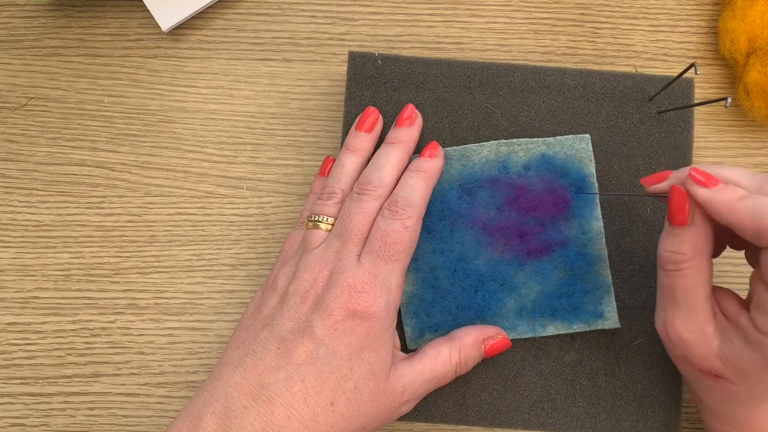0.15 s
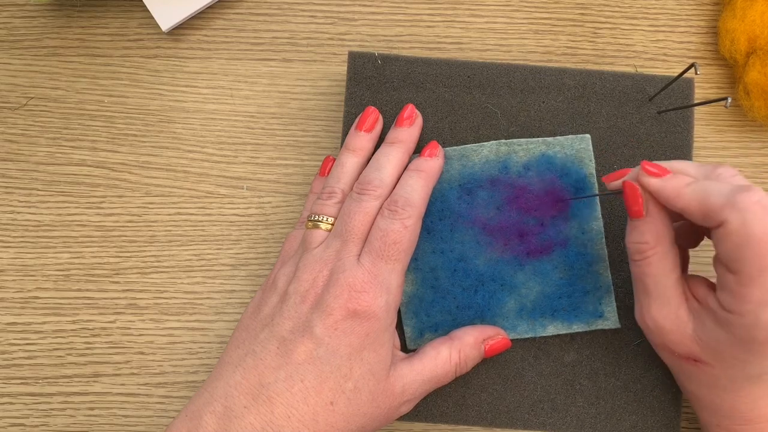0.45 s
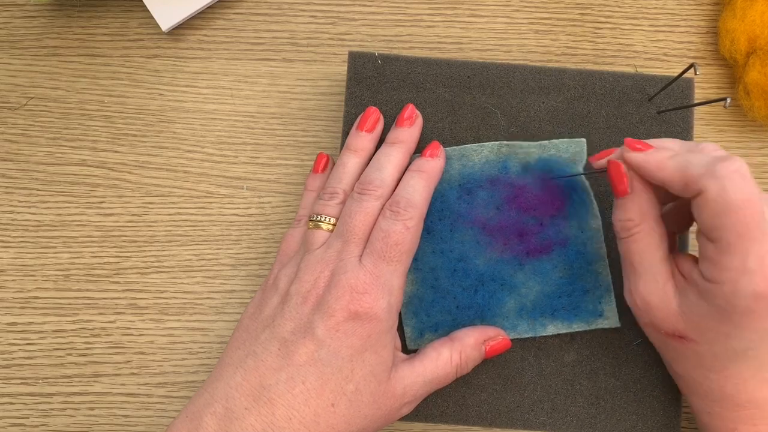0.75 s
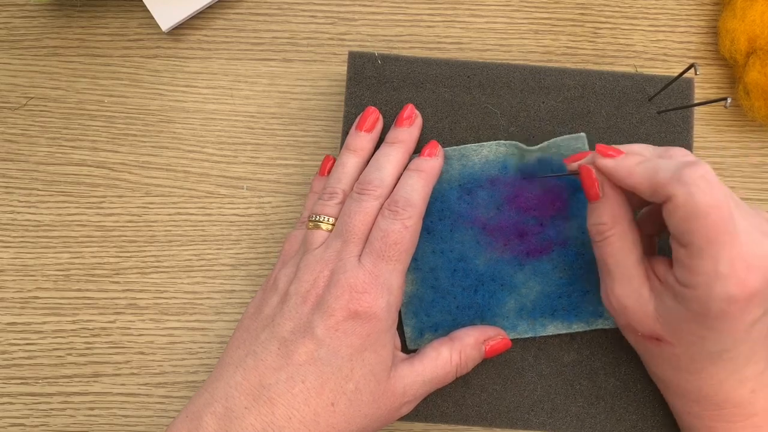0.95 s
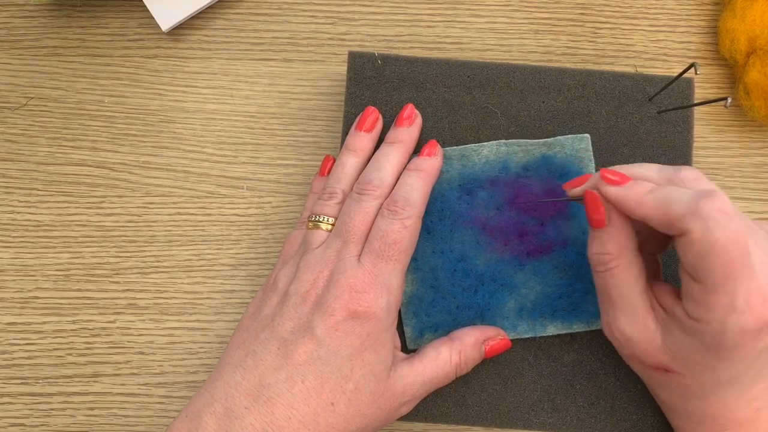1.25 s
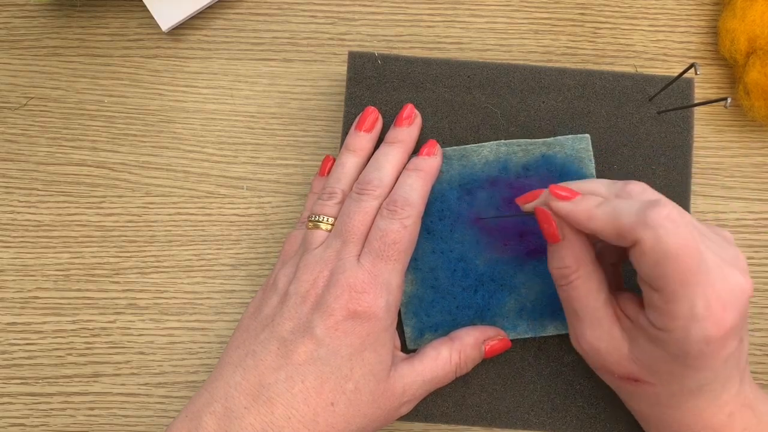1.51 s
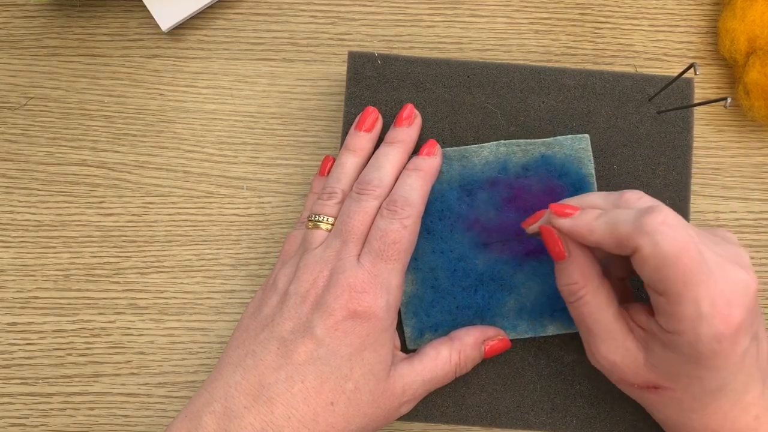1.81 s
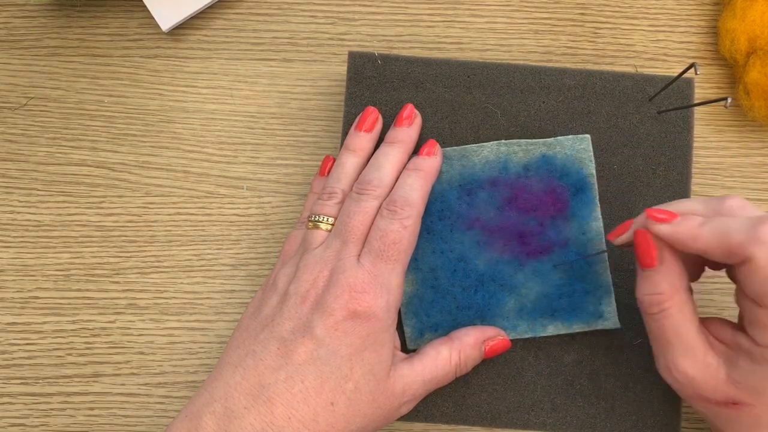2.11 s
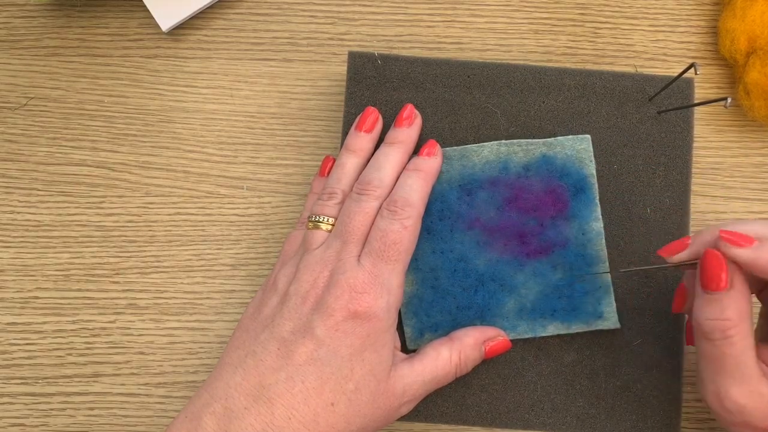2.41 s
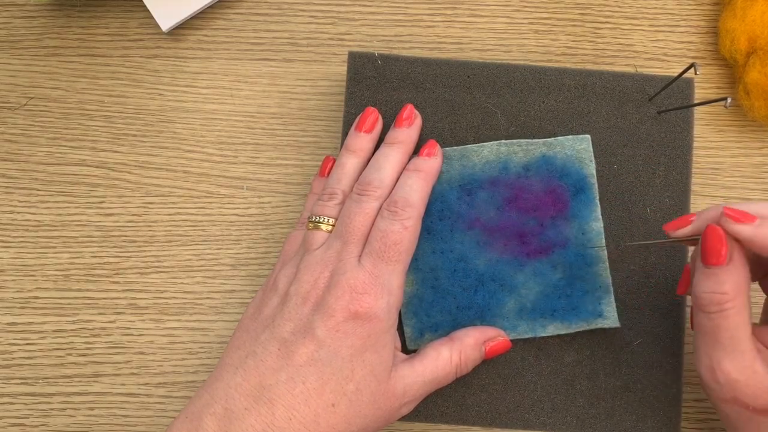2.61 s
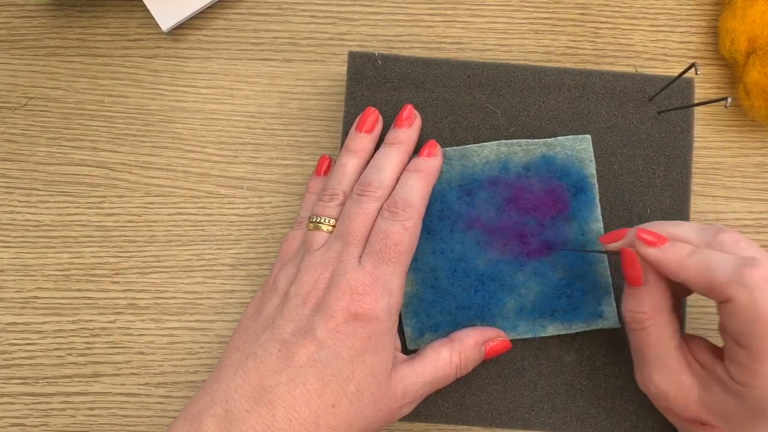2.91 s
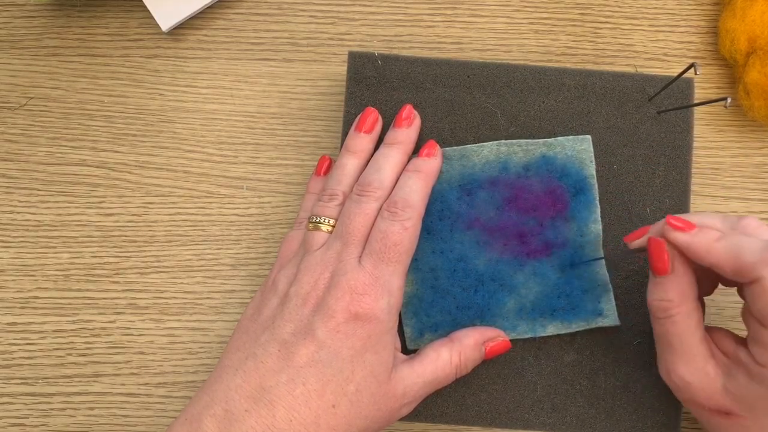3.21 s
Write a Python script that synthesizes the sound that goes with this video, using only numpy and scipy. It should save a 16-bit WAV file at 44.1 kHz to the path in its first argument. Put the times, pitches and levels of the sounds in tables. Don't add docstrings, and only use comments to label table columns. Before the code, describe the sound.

Rapid needle stabs crunch into felted wool on foam, each with a small table thud.

```python
import sys
import numpy as np
from scipy import signal
from scipy.fft import rfft, irfft, next_fast_len
from scipy.io import wavfile
from scipy.ndimage import map_coordinates

SR = 44100
rng = np.random.default_rng(int(sys.argv[2]) if len(sys.argv) > 2 else 0)


def log_audio(samples):
    frames = np.atleast_2d(samples).T
    limited = np.clip(frames, -1, 1)
    pcm = np.round(limited * 32767).astype(np.int16)
    wavfile.write(sys.argv[1], SR, pcm)


def to_linear_factor(level_db):
    exponent = np.asarray(level_db, float) / 20
    return 10 ** exponent


N = 147735

# frequency in Hz, level in dB per Hz.
AIR_COLOUR = [(15, -42), (25, -2), (185, 5), (591, -10), (1940, -14.5), (3080, -21.5), (3920, -21),
              (10700, -25), (16000, -29)]
# time in seconds, level in dB.
AIR_DRIFT = [(0, 2), (.6, 1), (1.7, 0), (2.5, -1.5), (3.35, -3)]
AIR_DB, HISS_TOP_HZ = -70.5, 16000
RUMBLE_HZ, RUMBLE_WIDTH_HZ, RUMBLE_DB = 66, 35, -67.5

# frequency in Hz, time to fall 60 dB in seconds.
ROOM_DECAY = [(150, 0.26), (700, 0.17), (3000, 0.14), (12000, 0.11)]
ROOM_DB = -14.5

# start in seconds, length in seconds, pitch in Hz, level in dB.
BIRDS = [
    (1.499, 0.11, 3450, -67.5),
    (1.724, 0.098, 3500, -68.5),
    (2.206, 0.07, 2720, -74),
    (3.06, 0.11, 2750, -66),
    (3.201, 0.096, 3350, -79),
    (3.275, 0.14, 3000, -72.5),
]
BIRD_SAG_HZ_PER_S, BIRD_BLUR_HZ, BIRD_HALO_HZ, BIRD_HALO_DB = 1800, 150, 420, -13

# frequency in Hz, level in dB, time to fall 60 dB in seconds.
TABLE_MODES = [(282.5, 2.5, 0.086), (357, 3.5, 0.049), (416, -8.5, 0.037), (565.3, 0.5, 0.47),
               (740, 1, 0.19), (1017, -3.5, 0.11), (1397, -8, 0.028), (1790, -8, 0.0067)]
# frequency in Hz, level in dB, time to fall 60 dB in seconds.
BOOM_MODES = [(130.7, -2, 0.11), (161, -5, 0.42), (188.9, -0.5, 0.41)]
# frequency in Hz, level in dB.
BENDING_WAVE = [(80, -23), (200, 4.5), (600, 7.5), (1500, -37.5), (2500, -10), (4000, -63)]
LATE_S, WAVE_DB = 0.01, -6
NOTE_DB, NOTE_OCTAVES, MODE_SCATTER_DB = 9, 0.24, 4.5
LONGEST_RING_S = 0.15

# time in seconds, thud level in dB, boom level in dB, thud note in Hz.
THUDS = [(0.075, -34.5, -52, 288), (0.24, -28, -46.5, 297), (0.413, -32, -46.5, 281),
         (0.578, -27, -46.5, 466), (0.769, -29, -38.5, 370), (0.942, -36, -49.5, 273),
         (1.115, -27.5, -43.5, 257), (1.286, -33.5, -51.5, 302), (1.464, -29.5, -48, 400),
         (1.635, -30, -46.5, 406), (1.805, -31, -53, 354), (1.98, -29.5, -47, 435),
         (2.147, -25.5, -48.5, 321), (2.332, -26, -49.5, 296), (2.496, -36.5, -58.5, 288),
         (2.671, -34, -55, 338), (2.874, -33.5, -56, 284), (3.051, -35.5, -52.5, 280),
         (3.2, -46, -63.5, 278)]
BOOM_NOTES_HZ = [150, 185, 185, 150, 185, 185, 150, 185, 185, 140, 150, 145, 155, 185, 185, 150, 150, 150,
                 150]
THUD_TILT_DB = [1, -1.5, 0.5, -3, 0.81, -4.8, -3.8, -1, -1, 0.66, 0.7, -2.1, -2.1, -2.4, -5.1, -2.3, -4,
                -3.8, -5.6]
THUD_DB, BOOM_DB = -13.5, -2
DRAG_DB, DRAG_RISE_S, DRAG_FALL_S = -19, 0.0024, 0.024

# time in seconds, snap in dB, its knock in dB, crunch in dB.
STABS = [(0.077, -35, -39, -56.5), (0.2451, -26, -35, -56), (0.416, -33.5, -34.5, -47),
         (0.5772, -40, -29.5, -48), (0.7651, -26, -28, -44.5), (0.9416, -30.5, -47.5, -48),
         (1.115, -32, -34, -67), (1.285, -36, -39, -46.5), (1.4661, -23, -34, -44), (1.6367, -24, -37, -59),
         (1.803, -42, -31.5, -55.5), (1.9754, -35.5, -33.5, -49), (2.146, -46, -29, -43.5),
         (2.333, -27, -29.5, -57), (2.4891, -35.5, -46, -55.5), (2.6726, -48, -38.5, -46),
         (2.8711, -37, -41, -46), (3.0513, -23.5, -32.5, -57.5), (3.1983, -72, -49.5, -71)]
# time in seconds, snap level in dB,
# knock level in dB.
SNAPS = [(0.4228, -28, -39.5), (0.5667, -43, -56), (0.5834, -38.5, -60), (0.7725, -56, -38.5),
         (0.9243, -44.5, -48), (0.9471, -45, -36.5), (1.1013, -52, -51.5), (1.2811, -42, -40.5),
         (1.2884, -27.5, -42), (1.4587, -51, -37.5), (1.4678, -33, -40.5), (1.4728, -50, -40),
         (1.6291, -31.5, -37.5), (1.6504, -35, -69), (1.8149, -32.5, -40.5), (1.9816, -46, -41),
         (2.138, -61, -47), (2.1501, -41, -37), (2.153, -30.5, -36), (2.1633, -26.5, -52),
         (2.3399, -27.5, -45), (2.3439, -34, -48), (2.4987, -44, -38.5), (2.5039, -40, -58),
         (2.6635, -36.5, -44), (2.682, -53, -48.5), (2.6897, -32.5, -47), (2.8672, -29.5, -50),
         (2.8791, -25.5, -39), (3.038, -57, -54), (0.633, -45, -68), (0.753, -44, -59), (1.9857, -47, -60),
         (2.028, -56, -50), (2.324, -38, -77), (2.537, -44, -57), (2.551, -53, -63), (2.915, -57, -59),
         (2.195, -44, -64), (0.291, -60, -72), (0.468, -49, -54), (1.158, -52, -54), (2.173, -45, -66),
         (2.205, -45, -67), (0.596, -39, -61), (1.8175, -36, -51)]
# frequency in Hz, level in dB.
BARB_COLOUR = [(500, -13), (1500, 7), (3000, -2), (6400, 1), (8000, -4), (12000, -5.5), (15500, -5.5),
               (16300, -14)]
SNAP_T60, SNAP_DB, ARRIVE_S, JOLT_SHARE = 0.0064, -3, 0.0008, 0.81
KNOCK_FROM_HZ, KNOCK_TO_HZ, KNOCK_SAG_S, KNOCK_T60, KNOCK_DB = 2175, 620, 0.00088, 0.0085, 3
CRUNCH_RISE_S, CRUNCH_FALL_S = 0.0061, 0.0069

# frequency in Hz, level in dB, time to fall 60 dB in seconds.
MAT_MODES = [(593, 7, 0.016), (1031, -4, 0.022), (1497, -2, 0.0064), (1755, -4, 0.0096),
             (2590, -17.5, 0.0033), (3060, 1, 0.0013)]
MAT_DB, MAT_SCATTER_DB, MAT_LATE_CYCLES = 1.5, 2.5, 1.25

# time in seconds, rustle level in dB, table level in dB.
PULLS = [(0.1196, -51, -48), (0.2914, -46.5, -40), (0.4663, -47, -44), (0.632, -51, -48),
         (0.8096, -45, -44), (0.9812, -49, -73.5), (1.1565, -49.5, -46), (1.335, -54, -49),
         (1.511, -49, -41), (1.6894, -50.5, -49), (1.859, -56, -43), (2.0273, -53.5, -47),
         (2.1954, -45.5, -45), (2.3743, -46.5, -45.5), (2.5374, -49.5, -71), (2.729, -54, -64),
         (2.9148, -49, -59), (3.0894, -53, -68), (3.2485, -58.5, -88)]
# frequency in Hz, level in dB.
WOOL_COLOUR = [(100, -71), (400, 11), (800, 18), (2000, 11), (3500, 2), (6500, -5.5), (10000, -13.5),
               (15500, -19)]
PULL_DB, PULL_THUD_DB = -14, -9.5
PULL_SHAPE = 0.013, 0.027, 1.43
TOUCH_DB, TOUCH_RISE_S, TOUCH_FALL_S = -29, 0.0091, 0.0019
CLUMPS_PER_S, CLUMP_DB = 70, 3
GRAINS_PER_S, GRAIN_SPREAD_DB, GRAIN_TOP_DB = 2500, 5, 10

# frequency in Hz, phase in radians.
LEAD = [(100, -.05), (500, -.3), (700, -1.2), (950, 0), (1650, 0), (2100, .9), (3500, 1.2), (4720, 3.14)]
LEAD_RAD_PER_KHZ = 1.544
# frequency in Hz, likeness from 0 to 1.
ALIKE = [(100, .98), (250, .985), (450, .92), (700, .6), (1300, .95), (2600, .7), (3500, .92), (4300, .998)]
# frequency in Hz, difference in dB.
TILT = [(300, 1), (550, 2), (700, 1.5), (950, -3.5), (1200, 2.5), (2300, -2.5), (3000, 6.5)]
TOP_HZ = 16650


def unit(x):
    return x / np.sqrt(np.mean(x ** 2) + 1e-20)


def along(points, hz):
    f, v = np.transpose(points)
    return np.interp(np.log(hz + 1), np.log(f + 1), v)


def filtered(x, response):
    m = next_fast_len(x.shape[-1] + SR // 4)
    return irfft(rfft(x, m) * response(np.fft.rfftfreq(m, 1 / SR)), m)[..., :x.shape[-1]]


def peak(f, hz, width_hz):
    return 1j * f * width_hz / (hz * hz - f * f + 1j * f * width_hz)


def swell(s, rise_s, fall_s, blunt=1):
    t = np.arange(N) / SR - s
    return np.where(t < 0, np.exp(-(t / rise_s) ** 2), np.exp(-(np.abs(t) / fall_s) ** blunt))


def air():
    hiss = unit(filtered(rng.standard_normal(N), lambda f: to_linear_factor(along(AIR_COLOUR, f)) * (f < HISS_TOP_HZ)))
    rumble = unit(filtered(rng.standard_normal(N), lambda f: peak(f, RUMBLE_HZ, RUMBLE_WIDTH_HZ) ** 2))
    low = filtered(hiss, lambda f: 1 / (1 + (f / 2200) ** 4))
    drift = to_linear_factor(np.interp(np.arange(N) / SR, *np.transpose(AIR_DRIFT)))
    return to_linear_factor(AIR_DB) * (hiss + (drift - 1) * low) + to_linear_factor(RUMBLE_DB) * drift * rumble


def room(x):
    out, step = np.zeros(N + SR), SR // 3
    for a in range(0, N, step):
        hz, t, z = signal.stft(rng.standard_normal(SR // 2), SR, nperseg=256)
        fading = z * to_linear_factor(-60 * t / along(ROOM_DECAY, hz)[:, None])
        tail = signal.istft(fading, SR, nperseg=256)[1]
        wet = signal.fftconvolve(x[a:a + step], tail / np.linalg.norm(tail))
        out[a + 300:][:len(wet)] += wet
    return out[:N]


def birds():
    def blur_shape(f):
        halo = to_linear_factor(BIRD_HALO_DB) * np.exp(-(f / BIRD_HALO_HZ) ** 2)
        return np.exp(-(f / BIRD_BLUR_HZ) ** 2) + halo

    out = np.zeros(N)
    for s, length, hz, db in BIRDS:
        t = np.arange(N) / SR - s
        blur = unit(filtered(rng.standard_normal(N), blur_shape))
        loudness = to_linear_factor(db) * np.sin(np.pi * np.clip(t / length, 0, 1) ** 0.79)
        whistle = np.sin(2 * np.pi * (hz - BIRD_SAG_HZ_PER_S * (t - length) / 2) * t)
        out += loudness * blur * whistle
    return out


def table(force, modes, note_hz, wave_db, tilt_db=0):
    lift = rng.normal(0, 1, len(modes)) * MODE_SCATTER_DB

    def response(f):
        ring = 0
        for k, (hz, db, t60) in enumerate(modes):
            near_db = NOTE_DB * np.exp(-(np.log2(hz / note_hz) / NOTE_OCTAVES) ** 2)
            width_hz = np.log(1000) / np.pi / min(t60, LONGEST_RING_S)
            ring = ring + (-1) ** k * to_linear_factor(db + lift[k] + near_db) * peak(f, hz, width_hz)
        wave = to_linear_factor(wave_db + along(BENDING_WAVE, f))
        tilt = to_linear_factor(tilt_db * np.log2(np.clip(f, 250, 1500) / 400))
        late = 4 * np.pi * LATE_S * (np.sqrt(300 * f) - f / 6)
        return (ring + wave) * tilt * np.exp(-1j * late)
    return filtered(force, response)


def grains(share=1):
    size_db = np.minimum(GRAIN_SPREAD_DB * rng.exponential(size=N), GRAIN_TOP_DB)
    size = to_linear_factor(size_db) * rng.standard_normal(N)
    ticks = size * (rng.random(N) < share * GRAINS_PER_S / SR)
    return unit(ticks + 0.5 * share * rng.standard_normal(N))


def thuds(jolts):
    out = np.zeros(N + SR)
    grip = sum(swell(s + DRAG_RISE_S, DRAG_RISE_S, DRAG_FALL_S) for s, *_ in THUDS)
    push = jolts + to_linear_factor(DRAG_DB) * grip * grains()
    for (s, db, boom_db, hz), boom_hz, tilt_db in zip(THUDS, BOOM_NOTES_HZ, THUD_TILT_DB):
        a = round((s - 0.03) * SR)
        force = np.pad(push[a:a + SR // 7], (0, SR // 3))
        thud = table(force, TABLE_MODES, hz, WAVE_DB, tilt_db)
        boom = table(force, BOOM_MODES, boom_hz, -99, tilt_db)
        for ring, level_db in [(thud, db + THUD_DB), (boom, boom_db + BOOM_DB)]:
            strength = np.sqrt(np.mean(ring[SR // 33:SR // 14] ** 2))
            out[a:a + len(ring)] += to_linear_factor(level_db) * ring / strength
    return out[:N]


def mat_knock(t):
    sweep = KNOCK_TO_HZ + (KNOCK_FROM_HZ - KNOCK_TO_HZ) * np.exp(-t / KNOCK_SAG_S)
    hz = sweep * to_linear_factor(rng.normal())
    knock = to_linear_factor(-60 * t / KNOCK_T60) * (1 - np.exp(-t / 0.0024)) * np.sin(2 * np.pi * np.cumsum(hz) / SR)
    for k, (mode_hz, db, t60) in enumerate(MAT_MODES):
        level_luck, pitch_luck = rng.standard_normal(2)
        soft = 1 - np.exp(-(t * mode_hz / MAT_LATE_CYCLES) ** 2)
        fall = to_linear_factor(MAT_DB + db + MAT_SCATTER_DB * level_luck - 60 * t / t60)
        tone = np.sin(2 * np.pi * mode_hz * to_linear_factor(0.5 * pitch_luck) * t)
        knock = knock + (-1) ** k * soft * fall * tone
    return knock


def barbs():
    t = np.arange(SR // 50) / SR
    snaps, knocks, jolts = np.zeros(N + SR), np.zeros(N + SR), np.zeros(N)
    for s, db, knock_db in [row[:3] for row in STABS] + list(SNAPS):
        at = round((s + ARRIVE_S) * SR)
        burst = (1 - np.exp(-t / 0.00032)) * rng.standard_normal(len(t))
        snaps[at:][:len(t)] += to_linear_factor(db + SNAP_DB - 60 * t / SNAP_T60) * burst
        knocks[at:][:len(t)] += to_linear_factor(knock_db + KNOCK_DB) * mat_knock(t)
        jolts[at] = to_linear_factor((knock_db + 45) * JOLT_SHARE)
    crunch = sum(to_linear_factor(db) * swell(s + CRUNCH_RISE_S, CRUNCH_RISE_S, CRUNCH_FALL_S) for s, *_, db in STABS)
    bright = filtered(snaps[:N] + crunch * grains(0.5), lambda f: to_linear_factor(along(BARB_COLOUR, f)) * (f > 300))
    dull = filtered(knocks[:N], lambda f: (1j * f / (200 + 1j * f)) ** 2)
    return bright + dull, jolts


def rustle():
    touch = sum(to_linear_factor(db + TOUCH_DB) * swell(s, TOUCH_RISE_S, TOUCH_FALL_S) for s, db, *_ in THUDS)
    pull = sum(to_linear_factor(db + PULL_DB) * swell(s, *PULL_SHAPE) for s, db, _ in PULLS)
    clumps = map_coordinates(rng.standard_normal(SR // 100), [np.arange(N) * CLUMPS_PER_S / SR])
    pull = pull * to_linear_factor(CLUMP_DB * clumps)
    return filtered(touch * grains() + pull * grains(0.44), lambda f: to_linear_factor(along(WOOL_COLOUR, f)))


def tugs():
    tug = sum(to_linear_factor(db + PULL_THUD_DB) * swell(s, *PULL_SHAPE) for s, _, db in PULLS) * grains()
    tugged = table(tug, TABLE_MODES, 293, WAVE_DB)
    return tugged * np.std(tug) / np.std(tugged)


def needle():
    snaps, jolts = barbs()
    return snaps + thuds(jolts) + rustle() + tugs()


def scene():
    near = needle() + birds()
    common = near + to_linear_factor(ROOM_DB) * room(near) + air()
    other = room(near) + air()

    def blend(f):
        turn = np.arccos(np.clip(along(ALIKE, f), 0, 1)) / 2
        return np.array([np.cos(turn), np.sin(turn)])
    mid, side = filtered(np.array([common, other]), blend)
    return np.array([mid + side, mid - side])


def roll_off(x):
    return signal.sosfilt(signal.butter(12, 16990, fs=SR, output="sos"), x)


def record(dry):
    hz, rad = np.transpose(LEAD)

    def ports(f):
        lead = np.interp(f, hz, rad) + LEAD_RAD_PER_KHZ * np.maximum(f - hz[-1], 0) / 1000
        half = to_linear_factor(along(TILT, f) * (f < 3800) / 2) * np.exp(0.5j * lead)
        return half ** np.array([[1], [-1]]) * (f < TOP_HZ)
    return roll_off(filtered(dry, ports))


dry = scene()
out = record(dry)
log_audio(out)
```